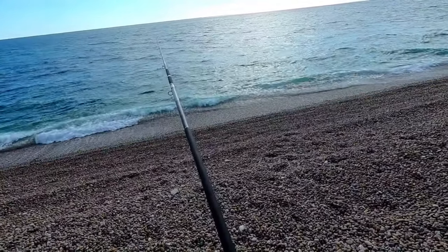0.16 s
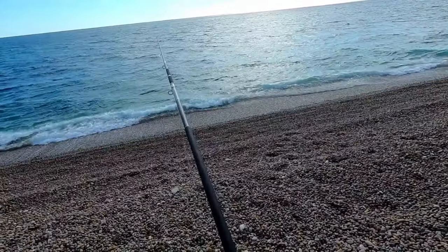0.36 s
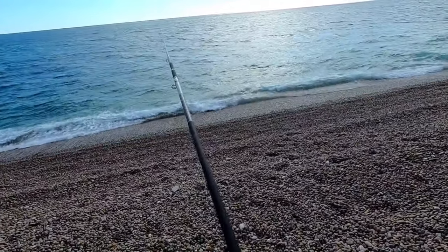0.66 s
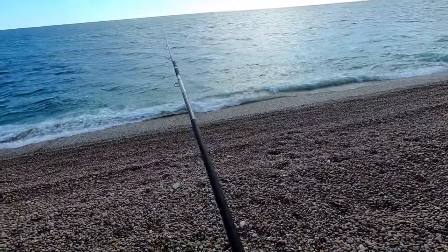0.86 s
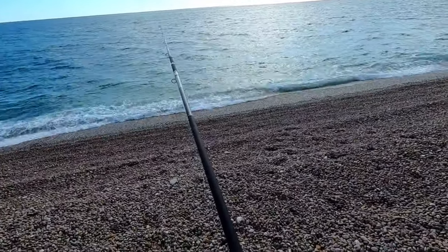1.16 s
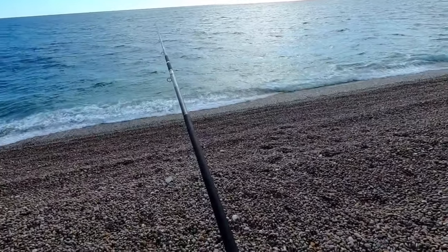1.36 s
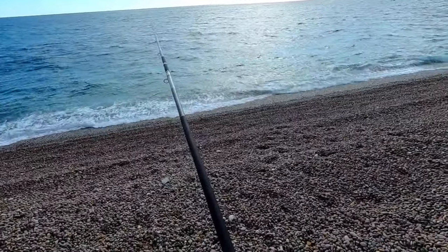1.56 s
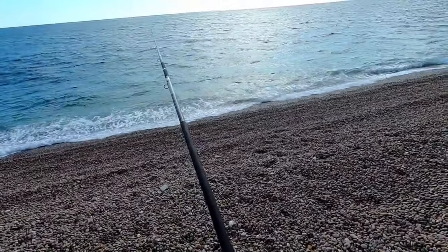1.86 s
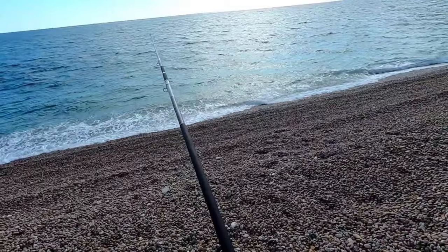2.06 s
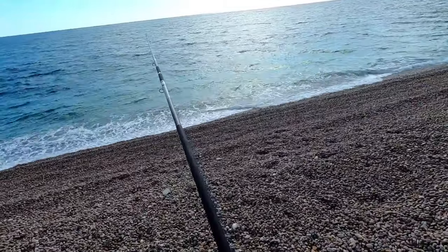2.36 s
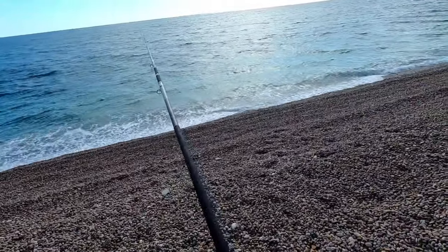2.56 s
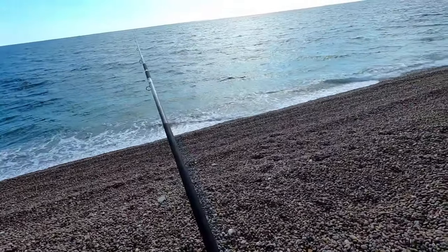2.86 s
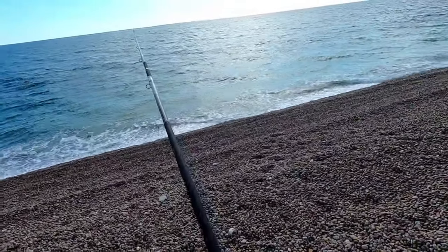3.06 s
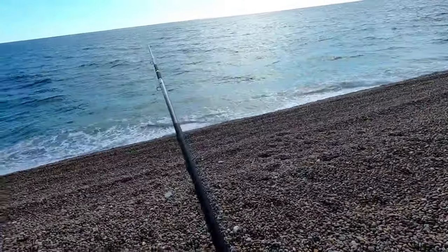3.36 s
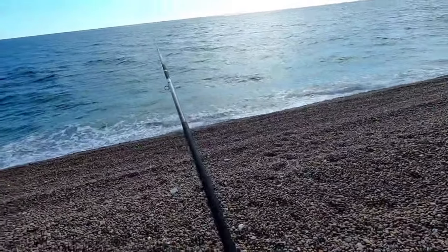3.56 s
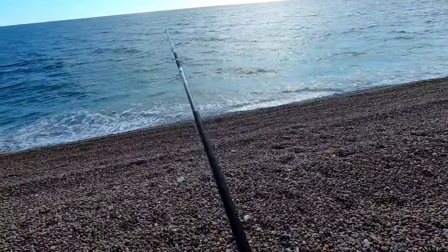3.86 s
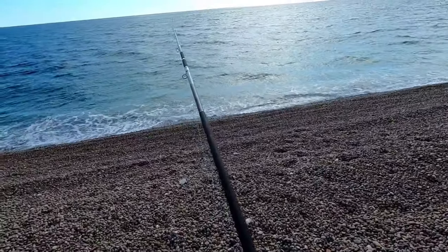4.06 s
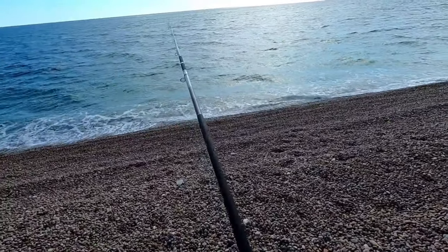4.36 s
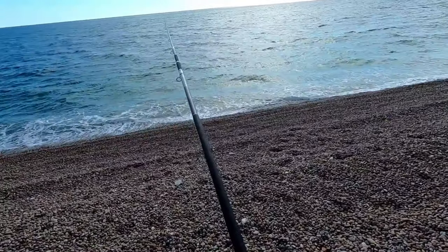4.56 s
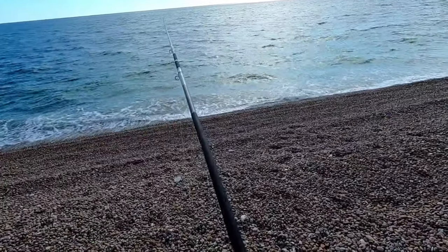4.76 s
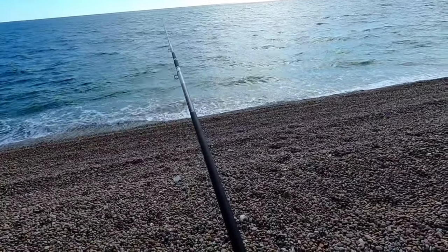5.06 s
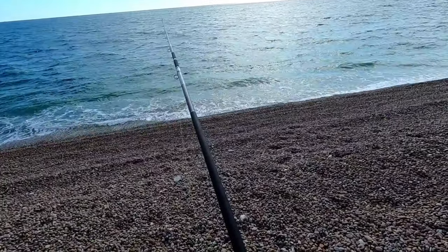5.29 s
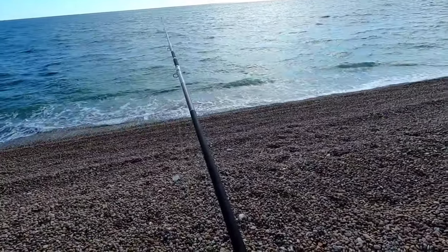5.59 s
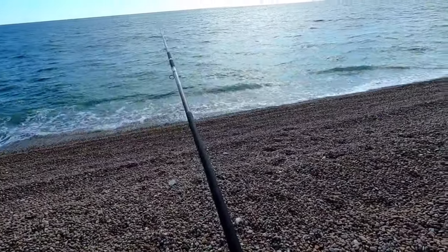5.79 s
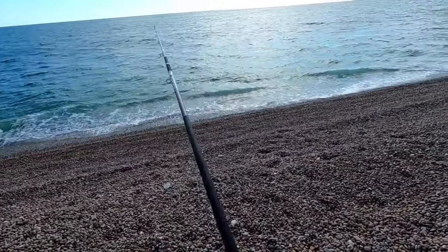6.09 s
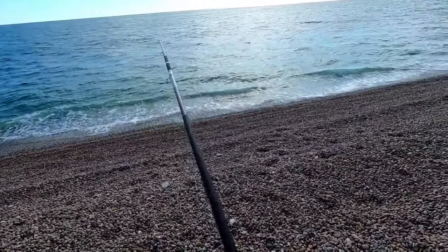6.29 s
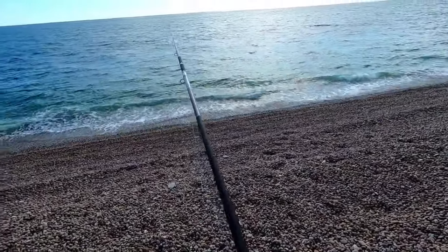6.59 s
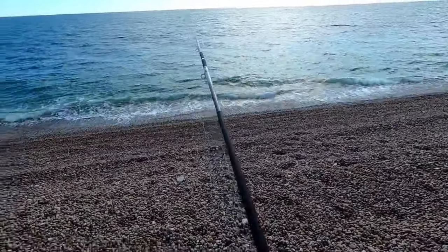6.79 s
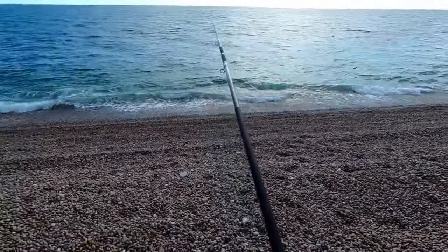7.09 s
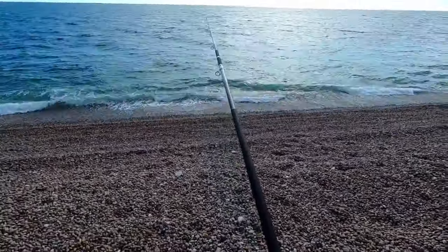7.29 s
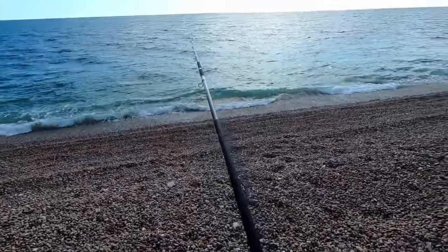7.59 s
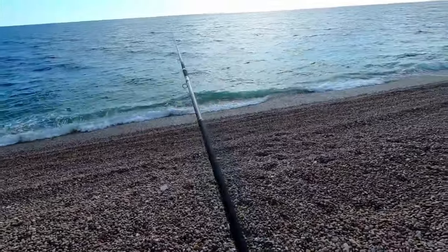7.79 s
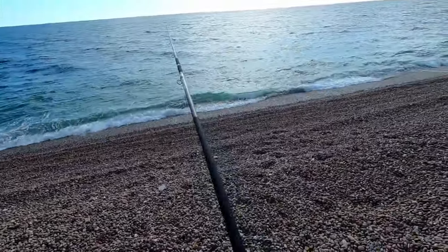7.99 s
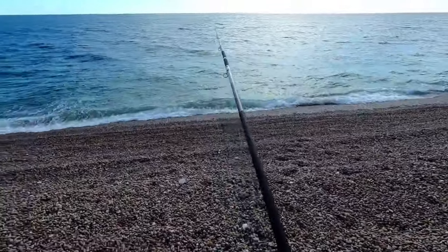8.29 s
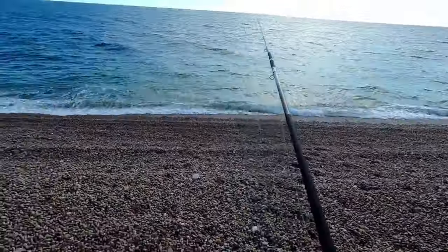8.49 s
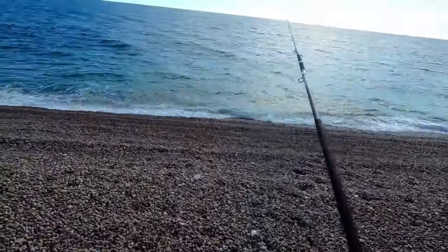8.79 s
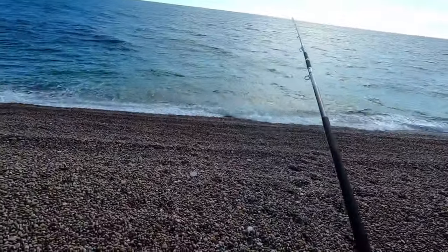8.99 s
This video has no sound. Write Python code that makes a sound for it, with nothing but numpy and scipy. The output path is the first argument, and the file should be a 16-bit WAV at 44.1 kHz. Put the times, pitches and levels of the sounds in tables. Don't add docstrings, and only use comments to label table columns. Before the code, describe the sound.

Wind rumbles deep and unevenly against a handheld microphone, with brief lulls and fluttering gusts. Behind it small surf washes a stony shore: a first wave roars and gargles, fades to light splashes, foam fizz and dry pebble knocks, then a long bright rattle of draining shingle leads into a second breaking wave. A few sharp wind puffs thump at the very end.

```python
import sys
import numpy as np
from scipy import signal
from scipy.io import wavfile
from scipy.ndimage import uniform_filter1d, map_coordinates

SR = 44100
rng = np.random.default_rng(int(sys.argv[2]) if len(sys.argv) > 2 else 0)


def put_to_file(sound):
    columns = np.atleast_2d(sound).T
    safe = np.clip(columns, -1, 1)
    whole_steps = np.round(safe * 32767)
    wavfile.write(sys.argv[1], SR, whole_steps.astype(np.int16))


def rack_gain(trim_db):
    fader = np.asarray(trim_db, float)
    return 10 ** (fader / 20)


N = 403074

# t/s, level/dB
FROTH = [(0, -54), (0.25, -59), (0.55, -54), (0.97, -63), (1.2, -56), (1.65, -61), (2.6, -61.5),
         (3.18, -60.5), (3.8, -62), (4.3, -65), (4.95, -56), (5.6, -55), (6.2, -52), (6.85, -50),
         (7.66, -54), (8.05, -52.5), (8.5, -59), (9.14, -59)]


def breakers():
    # t/s, level/dB
    water_fall = [(0, -33.5), (0.3, -33), (0.5, -32.5), (0.9, -34.5), (1.4, -34), (1.95, -36), (2.6, -43),
                  (3.1, -38), (3.4, -39.5), (3.7, -42.5), (4.05, -40.5), (4.8, -45), (5.7, -39.5),
                  (6.46, -42.5), (6.85, -37), (7.9, -34.5), (8.2, -32), (9.0, -35.5)]
    # f/Hz, level/dB per Hz
    roar_tone = [(120, -48), (200, -6.5), (300, -3.5), (450, -4), (700, -8.5), (1000, -24), (1600, -68)]
    # f/Hz, level/dB per Hz
    bubble_tone = [(600, -9.5), (780, -3), (950, -0.5), (1150, -2), (1400, -7), (1800, -25)]
    # t/s, centre f/Hz
    bubble_pitch = [(0, 1080), (1.0, 1050), (1.25, 870), (1.9, 870), (2.5, 980), (3.5, 960), (4.1, 960),
                    (5.0, 1120), (6.2, 1150), (6.8, 980), (8.3, 1000), (9.14, 900)]
    # t/s, level/dB rms, rise/s, length/s
    gurgles = [
        (1.08, -29, 0.13, .9),
        (3.8, -31.5, 0.74, 2.8),
        (5.0, -37, 0.46, 0.37),
        (6.55, -34.5, 0.3, 2.5),
    ]
    # f/Hz, level/dB per Hz
    spray_tone = [(7500, -17), (9000, -3), (11000, -8), (12000, -14), (13500, -21), (15200, -36)]
    roar_lift_db, caught_air_db = 2.5, 3
    spray_peak_db, far_spray_db = -56, -71.5
    fall_share, froth_share = 1.4, 0.34

    fall_db, froth_db = in_time(water_fall)[0], in_time(FROTH)[0]
    roar = coloured(roar_tone, shared_db=0.6, own_db=0.1, rate=4.1, per_octave=3)

    bubbles = coloured(bubble_tone, 0.62 * grains(400, 5.2), shared_db=0.65, own_db=0.48, rate=1.5)
    bubbles = at_speed(bubbles, in_time(bubble_pitch)[0] / 950)
    air = np.hypot(rack_gain(fall_db + caught_air_db), bursts(gurgles))

    spray = coloured(spray_tone, 0.4 * grains(120, 4.5), shared_db=-0.2, own_db=1.0, rate=20, per_octave=6)
    spray_db = spray_peak_db + fall_share * (fall_db - fall_db.max())
    spray_db = spray_db + froth_share * (froth_db - froth_db.max())
    spray_gain = power_sum(spray_db, far_spray_db)
    return rack_gain(fall_db + roar_lift_db) * roar + air * bubbles + spray_gain * spray


def wash():
    # t/s, flow as rattle level/dB, shift towards smaller stones/dB
    flow = [(0, -27.5, 2.5), (0.25, -28, -1), (0.97, -34, -0.5), (1.2, -32.5, 1), (1.75, -32.5, -5),
            (2.1, -39, 1.5), (2.65, -39.5, -0.5), (3.15, -37.5, -2.5), (3.75, -40.5, 3), (4.2, -37.5, -1),
            (4.5, -34.5, -1.5), (4.85, -30.5, -0.5), (5.5, -28, 0), (6.1, -30.5, 4), (7.0, -29, 1.5),
            (8.15, -29, -1.5), (8.8, -35.5, -2.5), (9.14, -35.5, -3.5)]
    # level/dB, share of flow swing, share of shift, delay/s
    sizes = [(1.5, 1.125, -0.11, 0.0012), (-3, 0.98, 0.79, 0.034), (-13.5, 0.92, .2, -0.045)]
    # centre t/s, level/dB, half width/s
    gravel_slides = [(0.6, 2.5, 0.34), (1.3, 1.5, .3), (2.0, 3, .25), (3.1, -3.5, 0.35), (3.8, 3, .25),
                     (4.55, 2.5, .25), (6.2, 2.5, 0.44), (7.8, -2, 0.59)]
    # f/Hz, level/dB per Hz
    stone_tone = [(900, -24), (1250, -2), (1900, 0), (2500, -2), (3000, -10.5), (3600, -19)]
    pebble_tone = [(2000, -11.5), (2800, 3), (3300, -1), (4000, -1.5), (4550, -5.5), (4750, -5),
                   (5100, -19)]
    gravel_tone = [(3800, -29), (4800, 1), (5800, -2), (6700, -5.5), (7400, -16), (8200, -18)]
    foam_tone = [(6000, -21), (7200, 5.5), (8500, -1.5), (9500, -4.5), (10800, -23), (11800, -32)]

    flow_db, shift_db = in_time(flow)
    t, top_db = np.arange(N) / SR, flow_db.max()
    levels_db = []
    for level_db, follows, shifts, delay in sizes:
        swing_db = np.interp(t - delay, t, flow_db) - top_db
        levels_db.append(top_db + level_db + follows * swing_db + shifts * shift_db)
    stones_db, pebbles_db, gravel_db = levels_db
    gravel_db = gravel_db + bumps(gravel_slides)

    knocks = grains(500, 3.9)
    stones = coloured(stone_tone, 0.18 * knocks, shared_db=-0.58, own_db=-0.65, rate=9.9)
    pebbles = coloured(pebble_tone, 0.22 * knocks, shared_db=-0.33, own_db=0.5, rate=37, per_octave=8)
    gravel = coloured(gravel_tone, 0.3 * knocks, shared_db=0.5, own_db=0.8, rate=17, per_octave=6)
    foam = coloured(foam_tone, 0.49 * knocks, shared_db=0.2, own_db=-0.5, rate=22, per_octave=6)

    surges = every_sample(rack_gain(0.25 * drift(12)))
    rattle = rack_gain(stones_db) * stones + rack_gain(pebbles_db) * pebbles + rack_gain(gravel_db) * gravel
    return surges * (rattle + rack_gain(in_time(FROTH)[0]) * foam)


def slaps():
    # t/s, level/dB rms, rise/s, length/s
    slap_hits = [(2.575, -41, .008, 0.029), (2.84, -45, .01, .03), (2.96, -45, .01, .03),
                 (3.18, -53, .008, .03), (3.32, -43, .02, 0.14), (3.575, -36, .012, .04),
                 (3.97, -44, .01, .03), (4.32, -47, .01, .04)]
    # f/Hz, level/dB per Hz
    slap_tone = [(2000, -10), (4000, 2), (5500, -9), (7200, -18), (9000, -18), (11000, -35), (12000, -34),
                 (14300, -42)]
    # t/s, level/dB rms, rise/s, length/s
    fizz_hits = [
        (2.83, -62, .02, .05),
        (3.315, -60, .015, .11),
        (3.95, -65, .02, .06),
    ]
    # f/Hz, level/dB per Hz
    fizz_tone = [(7200, -10), (8200, 2), (9500, 0), (10500, -6), (11500, -16)]
    splashes = bursts(slap_hits) * coloured(slap_tone, 0.3 * grains(600, 3.5), per_octave=3)
    return splashes + bursts(fizz_hits) * coloured(fizz_tone, per_octave=5)


def ticks():
    # t/s, peak level/dB
    knock_hits = [(2.574, -48), (3.7623, -31), (4.1295, -42), (4.8494, -52), (4.8894, -52), (4.9994, -50),
                  (5.0464, -50), (5.2594, -49), (5.4031, -47), (5.7494, -49), (6.0494, -40.5)]
    # low f/Hz, high f/Hz
    click_band = (7000, 11600)
    clicks = np.full(N, 1e-18)
    for s, peak_db in knock_hits:
        clicks[round(s * SR)] = rack_gain(peak_db + 10.0)
    return signal.sosfilt(signal.butter(2, click_band, "band", fs=SR, output="sos"), clicks)


def wind():
    # t/s, level/dB
    force = [(0, -26), (0.6, -24), (1.3, -21.5), (2.0, -20.5), (2.7, -22.5), (3.2, -21), (4.3, -21.5),
             (5.0, -21.5), (5.7, -22), (6.2, -21), (7.0, -22.5), (8.1, -22.5), (8.6, -19), (9.14, -20.5)]
    # centre t/s, depth/dB, half width/s
    lulls = [(0.13, 3.5, 0.097), (0.35, 5, 0.03), (0.76, 0, 0.041), (1.16, 2.5, .05), (1.33, 1, .03),
             (1.66, 5, 0.028), (2.27, 5, .05), (2.9, 3.5, 0.15), (3.59, 4, 0.021), (4.18, 2.5, .04),
             (4.66, 3, .04), (5.4, 1.5, 0.054), (6.4, 6.5, .08), (6.7, 6, 0.027), (7.45, 1.5, 0.14),
             (8.22, 1, 0.046), (8.38, 8, .03), (8.78, 4.5, .04), (8.97, 7, 0.025)]
    # centre t/s, lift/dB, half width/s
    gusts = [(0.07, 6, .03), (1.26, 3, .04), (1.38, 6.5, .06), (1.55, 3, 0.047), (1.8, 7, 0.032),
             (1.94, 9, 0.046), (2.08, 4, .04), (2.4, 12, .12), (2.55, 3, 0.07), (2.66, 9, 0.061),
             (3.45, 2.5, 0.087), (3.93, 10, 0.042), (4.08, 6, 0.079), (4.36, -1, 0.042), (4.62, 14, 0.051),
             (4.9, 9.5, 0.096), (4.42, 3.5, 0.044), (5.1, 8, 0.037), (5.62, 9.5, .04), (5.82, 4.5, .05),
             (6.05, 3, 0.017), (6.27, 0.5, .05), (6.62, 1, .04), (6.9, 5, .08), (7.15, 1, 0.05),
             (7.62, 0, 0.046), (8.3, 4, 0.08), (8.64, 7, 0.12), (8.94, 8, 0.038)]
    # t/s, level/dB rms, rise/s, length/s
    puff_hits = [(1.955, -44, .008, 0.016), (2.405, -24.5, 0.016, .04), (3.95, -31, 0.015, 0.057),
                 (4.6, -49, 0.011, 0.035), (4.86, -44, .012, 0.036), (8.68, -34, .012, 0.029),
                 (9.077, -15.5, .006, 0.02), (9.12, -19, .006, 0.028)]
    # f/Hz, level/dB per Hz
    buffet_tone = [(7.1, -38), (12, -17.5), (48, 5), (130, -11), (170, -51), (290, -120)]
    flutter_tone = [(50, -1.5), (90, 1), (120, 2.5), (160, -7), (220, -10.5), (320, -21.5), (500, -43)]
    puff_tone = [(100, -4), (170, -15), (250, -6), (350, -17), (500, -15), (700, -44)]
    gust_takes, flutter_slackens = 0.1, 1.05

    force_db, lull_db, gust_db = in_time(force)[0], bumps(lulls), bumps(gusts)
    air_speed = every_sample(rack_gain(1.6 * drift(12)))
    buffet = at_speed(coloured(buffet_tone, per_octave=2), air_speed)
    buffet = evened(buffet, size=2200, firmness=0.56)
    flutter = coloured(flutter_tone, own_db=1.1, rate=21, per_octave=3)
    flutter = evened(flutter, size=3000, firmness=0.86)
    puffs = bursts(puff_hits) * evened(coloured(puff_tone, per_octave=2), size=900, firmness=0.74)

    buffet_db = force_db + 1.5 - lull_db - gust_takes * gust_db
    flutter_db = force_db - 9.5 - flutter_slackens * lull_db + gust_db
    pressure = rack_gain(buffet_db) * buffet + rack_gain(flutter_db) * flutter
    return 0.35 * np.tanh(pressure / 0.33) + puffs


def coloured(spectrum, grainy=0, shared_db=0, own_db=0, rate=6, per_octave=4):
    hz, level_db = np.transpose(spectrum)
    edges = np.geomspace(hz[0], hz[-1], int(per_octave * np.log2(hz[-1] / hz[0])) + 2)
    white = rng.standard_normal((2, N + SR))
    white[:, SR:] += grainy
    together, out = drift(rate), 0
    for k, (low, high) in enumerate(zip(edges, edges[1:])):
        band_pass = signal.butter(2, [low, high], "band", fs=SR, output="sos")
        band = signal.sosfilt(band_pass, white[k % 2])[SR:]
        centre_db = np.interp(np.log(low * high) / 2, np.log(hz), level_db)
        swell_db = shared_db * together + own_db * drift(rate)
        out = out + band * every_sample(rack_gain(centre_db + swell_db))
    return rms_one(signal.sosfilt(signal.butter(6, hz[-1], fs=SR, output="sos"), out))


def grains(per_s, spread_db):
    sizes = rack_gain(spread_db * np.minimum(rng.exponential(1, N), 5)) * rng.choice([-1, 1], N)
    return rms_one(sizes * (rng.random(N) < per_s / SR))


def bursts(rows):
    t, envelope = np.arange(N) / SR, np.zeros(N)
    for s, level_db, rise, length in rows:
        since = np.maximum(t - s, 0)
        envelope += rack_gain(level_db) * np.minimum(since / rise, 1) * np.exp(-(since / length) ** 2)
    return envelope


def bumps(rows):
    t = np.arange(N) / SR
    return sum(size_db * np.exp(-((t - s) / width) ** 2) for s, size_db, width in rows)


def in_time(rows):
    s, *columns = np.transpose(rows)
    return [np.interp(np.arange(N) / SR, s, c) for c in columns]


def drift(rate):
    r = np.exp(-80 * np.pi * rate / SR)
    noise = rng.standard_normal(N // 40 + 2002)
    return rms_one(signal.lfilter([1], [1, -2 * r, r * r], noise)[2000:])


def every_sample(slow):
    return np.interp(np.arange(N) / 40, np.arange(len(slow)), slow)


def at_speed(x, speed):
    return map_coordinates(x, [np.cumsum(speed)], order=3, mode="mirror")


def evened(x, size, firmness):
    swing = np.sqrt(uniform_filter1d(x ** 2, size=size))
    return rms_one(x / (swing + 0.21) ** firmness)


def power_sum(a_db, b_db):
    return np.hypot(rack_gain(a_db), rack_gain(b_db))


def rms_one(x):
    return x / np.sqrt(np.mean(x ** 2) + 1e-20)


def scene():
    return (breakers() + wash() + slaps() + ticks() + wind())[None]


def band_limit(x):
    return signal.sosfilt(signal.butter(12, 14980, fs=SR, output="sos"), x)


def record(dry):
    # f/Hz, width/Hz, gain/dB
    port = [(1004, 200, 1.5), (1280, 200, 0), (1990, 300, 3), (2330, 1300, -3), (2780, 130, 1.5),
            (4610, 1800, 0.5), (7400, 480, -1.5), (10900, 900, 0.5)]
    x = dry
    for hz, width_hz, gain_db in port:
        r = np.exp(-np.pi * width_hz / SR)
        zeros = (1 - r * r) / 2 * np.array([1, 0, -1])
        poles = [1, -2 * r * np.cos(2 * np.pi * hz / SR), r * r]
        x = x + (rack_gain(gain_db) - 1) * signal.lfilter(zeros, poles, x)
    x = x * np.minimum((N - np.arange(N)) / 30, 1)
    return band_limit(x)


dry = scene()
out = record(dry)
put_to_file(out)
```